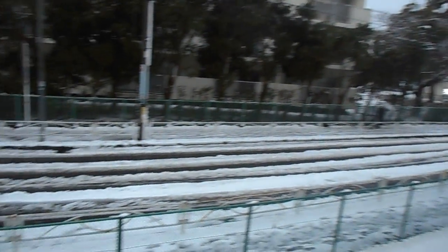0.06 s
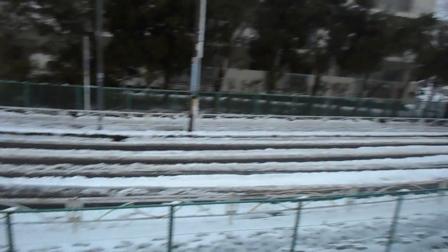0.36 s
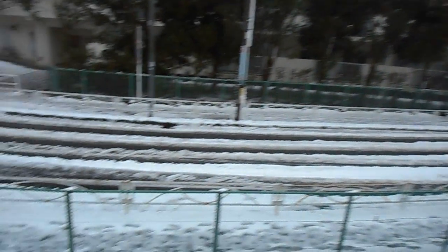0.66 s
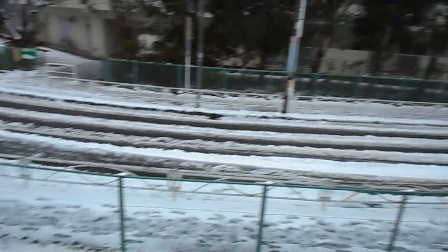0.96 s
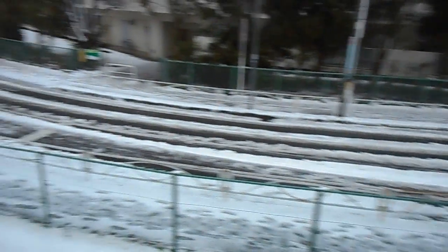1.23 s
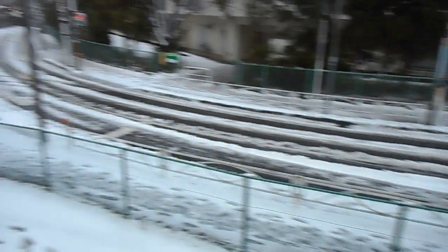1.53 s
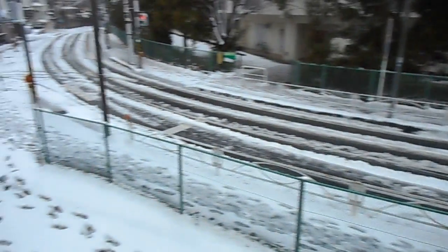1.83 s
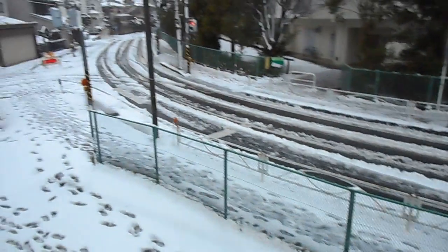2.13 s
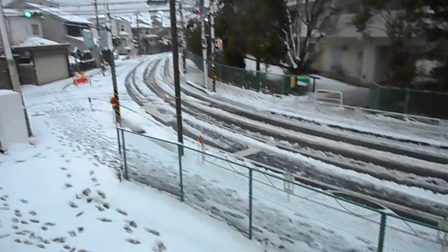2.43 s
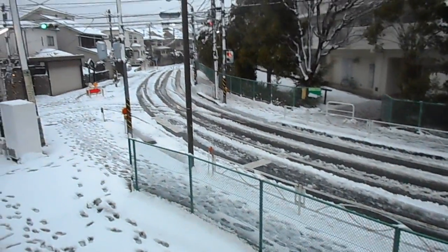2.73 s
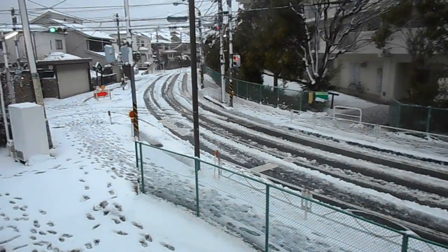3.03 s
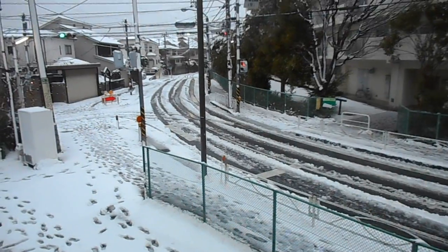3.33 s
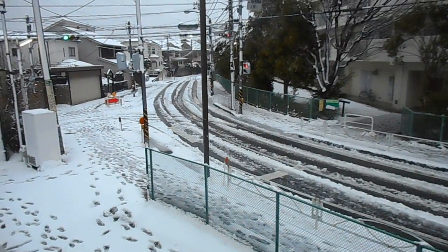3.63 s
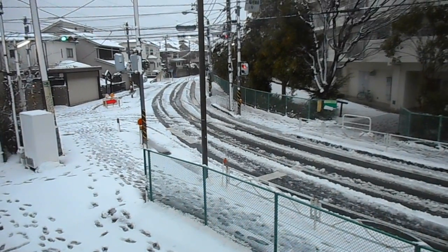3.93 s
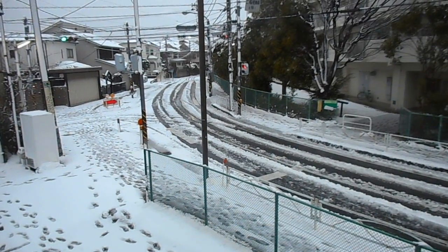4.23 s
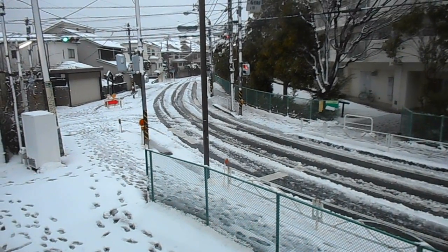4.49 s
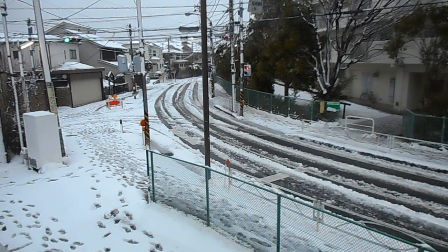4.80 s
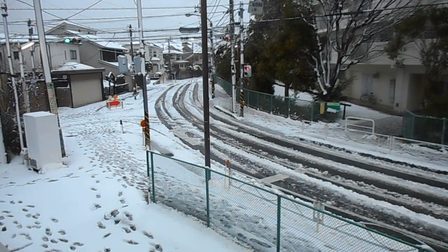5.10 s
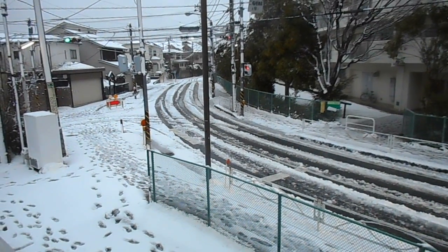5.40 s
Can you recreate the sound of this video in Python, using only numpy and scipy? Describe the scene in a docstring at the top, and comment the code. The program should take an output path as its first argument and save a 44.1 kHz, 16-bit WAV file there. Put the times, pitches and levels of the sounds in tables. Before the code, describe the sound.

Wet tyre swish on a slushy road, growing louder as a car nears, with light drips and short gusts buffeting the microphone.

```python
"""A slushy road, heard from a snowy bank above it. One car swishes away through the wet ruts,
then another comes closer. Their tyres roar on the road, hiss through the water and fling
lumps of slush that burst into droplets. Short gusts of wind rumble and thump on the
microphone, melt water ticks nearby, and a far-off town hums underneath."""
import sys
import numpy as np
from scipy import signal
from scipy.fft import rfft, irfft, next_fast_len
from scipy.io import wavfile
from scipy.ndimage import uniform_filter1d

SR = 44100
rng = np.random.default_rng(int(sys.argv[2]) if len(sys.argv) > 2 else 0)


def store_wav(level_fs):
    """Save 16-bit WAV to argv[1]."""
    pcm = np.round(np.clip(np.atleast_2d(level_fs), -1, 1) * 32767)
    wavfile.write(sys.argv[1], SR, pcm.T.astype(np.int16))


N = 244755
TIME = np.arange(N) / SR

# puddles the tyres swish through: (time [s], half length [s], rise of the spray [dB], pitch [Hz])
PUDDLES = [(0.043, .06, 2, 5900), (0.294, 0.052, 0.5, 6000), (0.452, 0.096, 4.5, 7200),
           (0.803, .04, 0.5, 5800), (0.994, 0.068, 2.5, 6000), (1.066, 0.11, 2.5, 5600),
           (1.274, 0.073, 2, 4560), (1.8, 0.059, 2.5, 5100), (3.855, 0.11, 1.5, 5500),
           (4.317, .05, 0.2, 3000), (4.513, 0.04, 3, 3800), (5.106, .03, 2, 3800), (5.224, 0.1, 1.5, 3800),
           (5.436, 0.023, 2.5, 4600)]
PUDDLE_HISS_SHARE = 0.74  # how much of that rise the wet hiss gets
# gusts on the microphone: (time of the peak [s], level [dB], half length [s], upper edge [Hz])
GUSTS = [(0.044, -41.5, 0.04, 198), (.965, -48, 0.0073, 220), (1.328, -23.5, 0.015, 770),
         (1.398, -22, 0.0047, 850), (1.419, -31.5, .01, 670), (1.571, -52, 0.039, 160),
         (2.19, -38.5, 0.0078, 450), (2.39, -40.5, 0.02, 400), (2.463, -36, 0.017, 447),
         (2.55, -39.5, 0.0083, 450), (3.3, -27, 0.028, 734), (3.42, -30.5, 0.015, 423),
         (3.48, -28.5, 0.016, 530), (3.577, -35, 0.051, 460), (3.703, -30, .03, 516),
         (3.778, -26.5, 0.0057, 600), (3.817, -35, 0.056, 470), (3.918, -34, 0.034, 615),
         (4.462, -37.5, 0.007, 358), (4.616, -21, 0.0072, 590), (4.646, -33.5, 0.033, 337),
         (5.15, -40, 0.022, 330), (5.25, -40.5, 0.036, 325), (5.42, -45.5, 0.052, 280)]


def cars():
    """One car fades round the bend as the next draws near."""
    start_s, fade_s = 2.11, 0.5
    handover = np.pi / 2 * np.clip((TIME - start_s) / fade_s, 0, 1)
    return np.cos(handover) * leaving_car() + np.sin(handover) * nearing_car()


def leaving_car():
    """A car swishes away through the ruts; each puddle lifts its hiss and spray."""
    # loudness of its tyres: (time [s], roar [dB], wet hiss [dB], spray [dB])
    levels = [(0, -45, -40, -37.5), (.3, -41.5, -39, -34.5), (.66, -46, -39, -36), (.88, -43, -39.5, -36.5),
              (1.08, -45, -37, -35.5), (1.4, -45, -37, -34.5), (1.65, -44.5, -35.5, -37),
              (2.05, -44, -38.5, -38.5)]
    # tone of its tyres: (frequency [Hz], relative level [dB])
    colour = [(150, -34), (350, -21), (550, -13.5), (750, -7.5), (1000, -4), (1400, -7), (2000, -4.5),
              (3000, -3.5), (4500, -2), (5800, -2.5), (7500, -6), (9000, -9), (10000, -12), (10600, -13)]
    roar_db, hiss_db, spray_db = follow(levels)
    rise_db, puddle_hz = puddle_rise(), follow(PUDDLES)[-1]
    noise = slush(colour, grain=0.53, patchy_db=0.45,
                  peak_hz=puddle_hz, peak_db=0.87 * rise_db, octaves=0.15)
    hiss_db += PUDDLE_HISS_SHARE * rise_db
    return tyres(noise, roar_db, hiss_db, spray_db + rise_db, flutter_db=0.67)


def nearing_car():
    """A car rolls closer at a steady speed, growing louder, brighter and grainier."""
    # tone of its tyres: (frequency [Hz], relative level [dB])
    colour = [(180, -36), (350, -21), (550, -12), (750, -5.5), (1100, -2.5), (1500, -3.5), (2200, -9.5),
              (3600, -7), (4700, -6.5), (6400, -6), (8300, -9.5), (9300, -13), (10000, -14), (10600, -17)]
    alongside_s, speed_m_per_s, closest_m = 5.59, 8.54, 4.3
    near = closest_m / np.hypot(closest_m, speed_m_per_s * (TIME - alongside_s))  # 1 when alongside
    rise_db = puddle_rise()
    # each level drops by a fixed number of dB for every tenfold distance
    roar_db = -36.5 + 9.2 * np.log10(near)
    hiss_db = -24.5 + 14.35 * np.log10(near) + PUDDLE_HISS_SHARE * rise_db
    spray_db = -26 + 18.2 * np.log10(near) + rise_db
    # the wedge between tyre and road acts as a horn, beaming the roar ahead of the car
    roar_db += 6.5 * bell(s=5.14, length=0.28)
    # the tread hums in the wet ruts, lower and fainter as it comes alongside
    far_hz, near_hz = 2240, 1650
    tread_hz = far_hz + (near_hz - far_hz) * near ** 2
    noise = slush(colour, grain=0.12 + 0.52 * near, patchy_db=1.16,
                  peak_hz=tread_hz, peak_db=3.6 * (1 - near), octaves=0.31)
    return tyres(noise, roar_db, hiss_db, spray_db, flutter_db=1.5 * near)


def tyres(noise, roar_db, hiss_db, spray_db, flutter_db):
    """Low tread roar, wet hiss and high, fine spray; the finest water flutters most."""
    low = lambda f: below(f, 1840, order=4) ** 2
    high = lambda f: 1 - below(f, 5160, order=4) ** 2
    roar = unit(shaped(noise, low)) * amp(roar_db)
    hiss = unit(shaped(noise, lambda f: 1 - low(f) - high(f))) * amp(hiss_db)
    spray = unit(shaped(noise, high)) * amp(spray_db)
    flutter = flutter_db * wander(hz=45.4)
    return (roar + hiss) * amp(0.79 * flutter) + spray * amp(flutter)


def slush(colour, grain, patchy_db, peak_hz, peak_db, octaves):
    """Water leaves the tread in uneven patches, from smooth sheets (grain 0) to droplets (grain 1)."""
    # steady resonances of the street: (frequency [Hz], width [Hz], boost or cut [dB])
    street = [(910, 110, -1.5), (1390, 140, 0.5), (2000, 520, 1.3), (3250, 130, 0), (4700, 930, -1)]
    sheets = np.sqrt(1 - grain) * rng.standard_normal(N)
    drops = np.sqrt(grain) * droplets(per_s=5000, spread_db=3.0)
    # cut the sound into short slices so that its tone can change over time
    f, t, slices = signal.stft(sheets + drops, SR, nperseg=512, noverlap=384)
    f = f[:, None]
    patches = uniform_filter1d(rng.standard_normal(slices.shape), size=8, axis=0)  # smooth over pitch
    patches = unit(uniform_filter1d(patches, size=14, axis=1))  # and over time
    tone_db = read(colour, f) + patchy_db * patches
    tone_db += sum(db * np.exp(-2 * ((f - hz) / width) ** 2) for hz, width, db in street)
    tone_db += np.interp(t, TIME, peak_db) * hump(f, np.interp(t, TIME, peak_hz), octaves)  # gliding peak
    return signal.istft(slices * amp(tone_db), SR, nperseg=512, noverlap=384)[1][:N]


def puddle_rise():
    """The rise in dB as the tyres plough through one puddle after another."""
    return sum(db * bell(s, length) for s, length, db, _ in PUDDLES)


def droplets(per_s, spread_db):
    """Countless tiny impacts, a few of them much larger than the rest."""
    size = amp(spread_db * np.minimum(rng.exponential(1, N), 3.8))
    return unit(size * rng.choice([-1, 1], N) * (rng.random(N) < per_s / SR))


def splats():
    """Each lump of slush bursts into a short cloud of droplets."""
    # big lumps thrown by the tyres: (time [s], level [dB], half length [s], pitch [Hz])
    lumps = [(0.542, -35, 0.012, 1320), (1.486, -30.5, 0.0059, 2150), (2.049, -36, 0.0066, 1400),
             (3.298, -23, 0.0022, 1850), (4.486, -25, 0.0075, 4900), (5.052, -20.5, 0.0018, 1700),
             (5.124, -21, 0.0049, 3800), (5.204, -22, 0.0065, 4200), (5.233, -18, 0.0031, 1880),
             (5.252, -21, 0.0076, 1730), (5.453, -23, 0.0099, 3950), (5.535, -19.5, 0.0056, 3800)]
    out, t = np.zeros(N), np.arange(-2048, 2048) / SR
    cloud = droplets(per_s=14000, spread_db=2.0)
    for s, db, length, hz in lumps:
        drops = np.roll(cloud, rng.integers(N))[:len(t)]
        burst = unit(shaped(drops, lambda f: hump(f, hz, octaves=1.0)))
        add(out, s + t[0], amp(db) * burst * np.exp(-2 * (t / length) ** 2))
    return out


def gusts(lumpy_db):
    """Air churns over the microphone; a gust starts and ends as a rumble and is brightest at its peak."""
    out, t = np.zeros(N), np.arange(-16384, 16384) / SR
    lumps = unit(amp(lumpy_db * wander(hz=70.0)))
    for s, db, length, hz in GUSTS:
        cut_highs = lambda f: below(f, hz, order=4) * below(f, 0.99 * hz, order=1)
        cut_lows = lambda f: (1 - below(f, 0.29 * hz, order=1) ** 2) ** 0.63
        air = unit(shaped(rng.standard_normal(len(t)), lambda f: cut_highs(f) * cut_lows(f)))
        rumble = shaped(air, lambda f: below(f, 0.35 * hz, order=2))
        swell = 1 / np.cosh(np.minimum(abs(t) / length, 20))
        blow = rumble * swell ** 0.77 + (air - rumble) * swell ** 2.1
        blow *= np.roll(lumps, rng.integers(N))[:len(t)]
        add(out, s + t[0], amp(db) * unit(blow) * np.sqrt(np.mean(swell ** 2)))
    return out


def eddies():
    """Small whirls of air thump the microphone: the pressure swings briefly and dies away."""
    # the hardest whirls: (time [s], peak level [dB], pitch [Hz], time to build and to die [s])
    thumps = [(1.35, -13.5, 223, 0.0021), (1.398, -13, 433, 0.0024), (2.398, -17.5, 195, 0.0014),
              (2.458, -25, 286, 0.002), (3.312, -8, 637, 0.00062), (3.451, -11.5, 220, 0.00067),
              (3.486, -15, 180, 0.0013), (3.686, -16.5, 325, 0.0011), (3.772, -10.5, 440, 0.0021),
              (3.877, -14, 292, .0018), (3.918, -15, 427, 0.0011), (4.61, -17.5, 230, 0.0024),
              (4.616, -15, 367, 0.0016), (5.143, -22, 290, .0022)]
    out, t = np.zeros(N), np.arange(-2048, 2048) / SR
    for s, db, hz, fade_s in thumps:
        swing = np.cos(2 * np.pi * (hz * t + rng.random())) * np.exp(-abs(t) / fade_s)
        swing = shaped(swing, lambda f: below(f, 4 * hz, order=4))
        add(out, s + t[0], amp(db) * swing / abs(swing).max())
    return out


def wakes(relative_db, rise_s, fall_s):
    """The air stays stirred for a moment after each gust, leaving a faint rumble."""
    power = np.zeros(N)
    for s, db, *_ in GUSTS:
        swell = np.exp(-np.maximum((s - TIME) / rise_s, (TIME - s) / fall_s))
        power += amp(db + relative_db) ** 2 * swell
    rumble = unit(shaped(rng.standard_normal(N), lambda f: below(f, hz=160, order=3)))
    return np.sqrt(power) * rumble


def drips(decay_s):
    """Drops of melt water land with a dry tick."""
    # drops close by: (time [s], peak level [dB], pitch [Hz])
    drops = [(.058, -18.5, 6500), (0.453, -14.5, 6500), (0.54, -14, 5500), (.829, -16, 5060),
             (1.067, -12.5, 7000), (1.479, -13.5, 3540), (1.573, -14, 8000), (1.641, -15.5, 3580),
             (2.123, -23, 6000), (2.464, -17.5, 6000), (3.295, -11, 6250), (3.901, -7, 6500)]
    out, t = np.zeros(N), np.arange(1024) / SR
    for s, db, hz in drops:
        noise = shaped(rng.standard_normal(len(t)), lambda f: hump(f, hz, octaves=0.89))
        tick = noise * np.exp(-t / decay_s)
        add(out, s - decay_s / 2, amp(db) * tick / abs(tick).max())
    return out


def town():
    """A low wash of engines and distant traffic."""
    # tone of the far-off town: (frequency [Hz], relative level [dB])
    colour = [(20, -9), (50, -10), (100, -11.5), (190, -2), (280, -4), (400, -3), (650, -2.5), (1200, -12),
              (3000, -53)]
    # its loudness, swelling as the car nears: (time [s], level [dB])
    levels = [(0, -52.5), (.8, -52.5), (1.9, -52), (3, -49), (4.3, -49), (5.2, -48), (5.55, -46.5)]
    wash = unit(shaped(rng.standard_normal(N), lambda f: amp(read(colour, f))))
    return wash * amp(follow(levels)[0] + wander(hz=8.2))


def amp(db):
    """Turns decibels into a number to multiply by."""
    return 10 ** (np.asarray(db) / 20)


def unit(x):
    """Scales a signal to an average power of 1."""
    return x / np.sqrt(np.mean(x ** 2) + 1e-20)


def follow(rows):
    """Joins the rows of a table over time, giving one curve for each column after the first."""
    times, *columns = np.transpose(rows)
    return [np.interp(TIME, times, column) for column in columns]


def read(points, hz):
    """Looks up the level in dB at any frequency in a tone table."""
    f, db = np.transpose(points)
    return np.interp(np.log(hz + 1), np.log(f + 1), db)


def shaped(x, gain):
    """Filters x: each frequency f is multiplied by gain(f)."""
    size = next_fast_len(len(x))
    f = np.fft.rfftfreq(size, 1 / SR) + 1e-3
    return irfft(rfft(x, size) * gain(f), size)[:len(x)]


def below(f, hz, order):
    """A filter curve that keeps what lies below hz; a higher order cuts more steeply."""
    return 1 / np.sqrt(1 + (f / hz) ** (2 * order))


def hump(f, hz, octaves):
    """A filter curve that keeps what lies around hz."""
    return np.exp(-.5 * (np.log2((f + 1) / hz) / octaves) ** 2)


def bell(s, length):
    """A smooth swell of height 1 around time s."""
    return np.exp(-((TIME - s) / length) ** 2)


def wander(hz):
    """A random wobble, up to about hz times a second."""
    return unit(shaped(rng.standard_normal(N), lambda f: below(f, hz, order=2)))


def add(mix, s, sound):
    """Mixes a sound in at time s."""
    start = round(s * SR)
    sound = sound[max(-start, 0):]
    part = mix[max(start, 0):][:len(sound)]
    part += sound[:len(part)]


def scene():
    """Road, drips and town, with the wind on top."""
    outdoors = cars() + splats() + drips(decay_s=0.0011) + town()
    wind = gusts(lumpy_db=6.0) + wakes(relative_db=-21, rise_s=0.023, fall_s=0.039) + eddies()
    return (outdoors + wind)[None]


def record(dry):
    """A small camera microphone loses the deepest bass and cuts off the highest treble sharply."""
    thin = shaped(dry[0], lambda f: (1 - below(f, 19, order=1) ** 2) * below(f, 9570, order=16))
    treble_cut = signal.firwin(511, cutoff=10600, window=("kaiser", 9), fs=SR)
    return signal.oaconvolve(thin, treble_cut, "same")[None]


dry = scene()
out = record(dry)
store_wav(out)
```